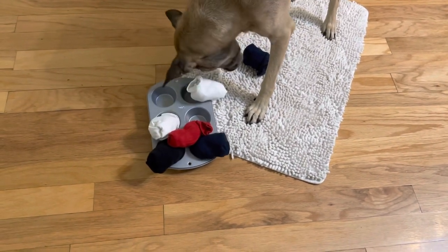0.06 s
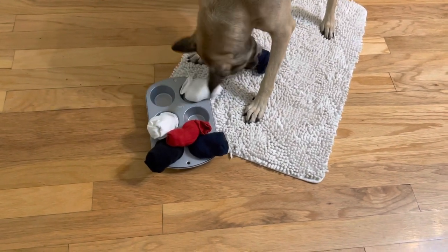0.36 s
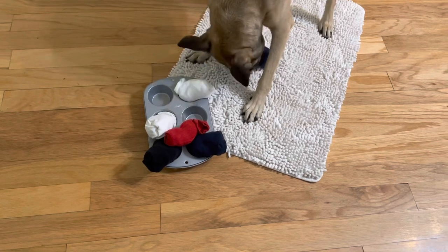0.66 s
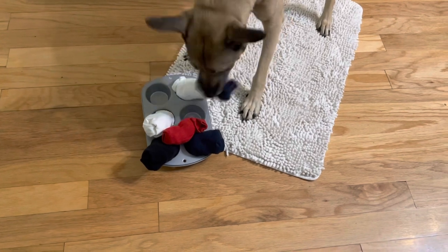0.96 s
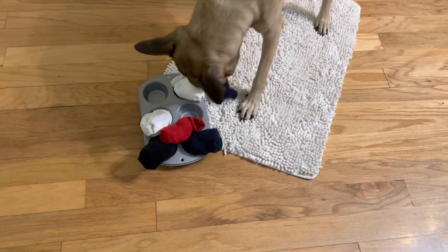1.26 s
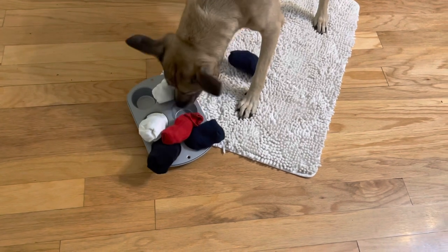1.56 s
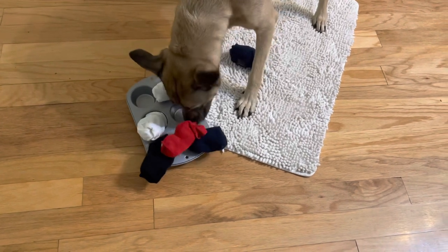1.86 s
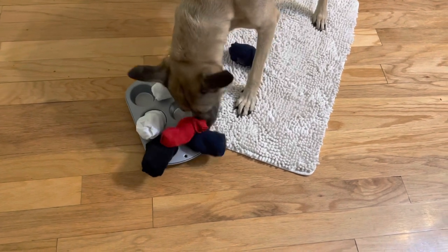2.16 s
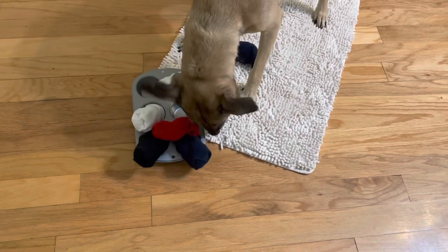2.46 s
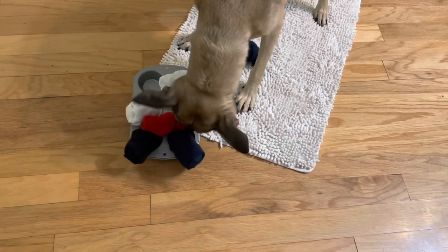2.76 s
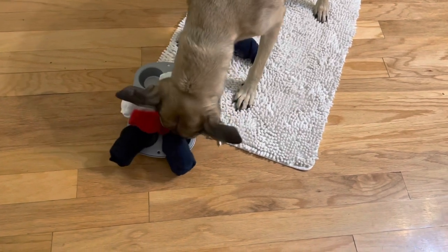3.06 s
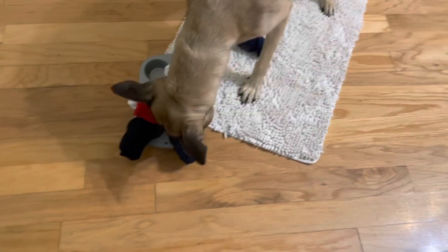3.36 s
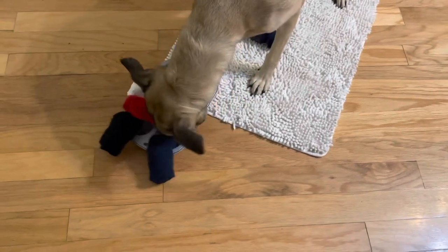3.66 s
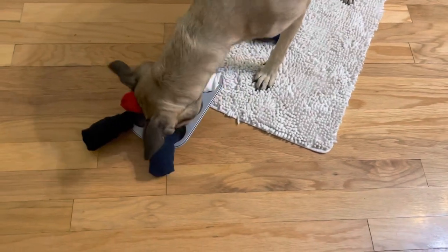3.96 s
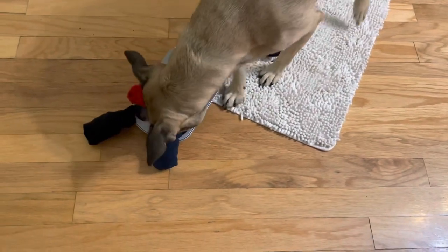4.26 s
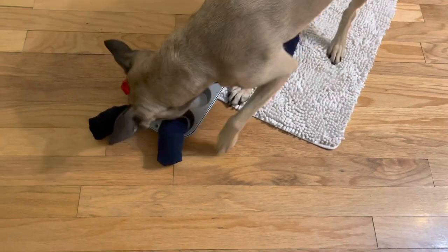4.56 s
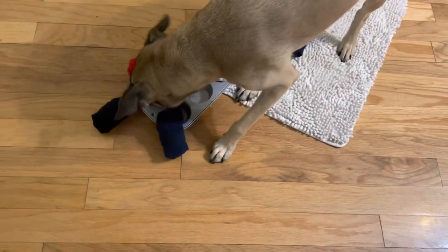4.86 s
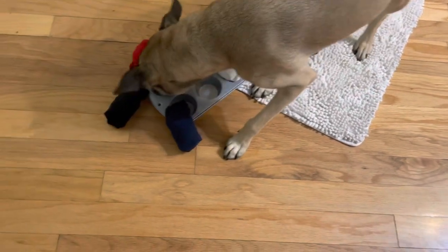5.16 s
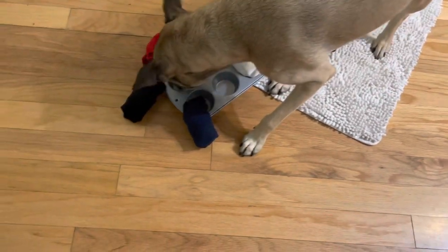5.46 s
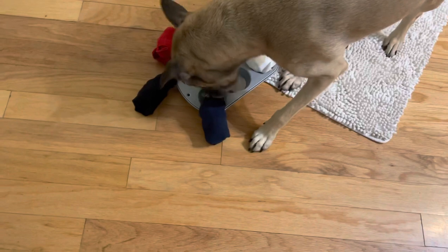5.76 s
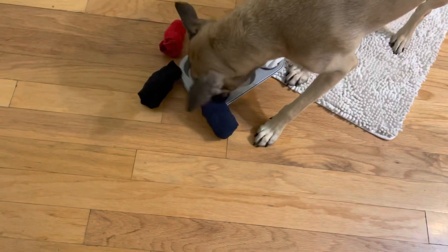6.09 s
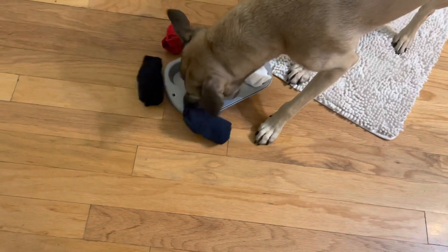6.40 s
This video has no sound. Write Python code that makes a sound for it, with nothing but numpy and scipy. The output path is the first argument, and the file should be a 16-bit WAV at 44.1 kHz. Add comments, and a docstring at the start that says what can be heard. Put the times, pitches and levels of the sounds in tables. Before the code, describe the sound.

Irregular clanks and light ringing clinks of a steel baking tin nudged across floorboards by a dog, with small claw clicks.

```python
"""A steel muffin tin knocks and clinks on a wooden floor as a dog noses cloth bundles out of it.
Each drop rings the pan's low modes until muzzle and cloth damp them; light touches ring the thin steel
brightly. The tin slides on grit, and once grates and sings as it is dragged. Claws and teeth tick,
cloth rustles and the dog's weight thumps the boards. All is heard from a metre or two away,
in a live room with a low household rumble."""
import sys
import numpy as np
from scipy import signal
from scipy.fft import rfft, irfft, next_fast_len
from scipy.io import wavfile

SR = 44100
rng = np.random.default_rng(int(sys.argv[2]) if len(sys.argv) > 2 else 0)


def generate_wav(sig):
    """Save sig (samples, or channels by samples) to the path in sys.argv[1] as 16-bit PCM at SR."""
    pcm = np.round(np.clip(np.atleast_2d(sig).T, -1, 1) * 32767).astype(np.int16)
    wavfile.write(sys.argv[1], SR, pcm)


N = 283563
TIME = np.arange(N) / SR
AGE = TIME[:SR]  # seconds since a hit


def undb(db):
    """Decibels to gain."""
    return 10 ** (np.asarray(db) / 20)


def unit(x):
    """Scale to rms 1."""
    return x / np.sqrt(np.mean(x ** 2))


def unit_peak(x):
    """Scale to peak 1."""
    return x / np.abs(x).max()


def noise(size):
    """White noise."""
    return rng.standard_normal(size)


def waver(size, rate_hz):
    """Smooth random wandering, spread near 1."""
    place = np.arange(size) * rate_hz / SR
    knots = noise(int(place[-1]) + 2)
    return np.interp(place, np.arange(len(knots)), knots)


def curve(points, hz):
    """Join (freq_hz, value) points on a log-frequency axis."""
    freq_hz, value = np.transpose(points)
    return np.interp(np.log(np.maximum(hz, 1)), np.log(freq_hz), value)


def eq(x, points):
    """Minimum-phase equaliser through (freq_hz, gain_db) points."""
    size = next_fast_len(len(x) + 4096, True)
    cepstrum = irfft(np.log(undb(curve(points, np.fft.rfftfreq(size, 1 / SR)))), size)
    cepstrum[1:size // 2] *= 2
    cepstrum[size // 2 + 1:] = 0
    return irfft(rfft(x, size) * np.exp(rfft(cepstrum)), size)[:len(x)]


def resonate(x, hz, width_hz, skirt):
    """Two band-passes in series, the second one skirt times as wide."""
    for band_hz in (width_hz, skirt * width_hz):
        x = signal.lfilter(*signal.iirpeak(hz, hz / band_hz, fs=SR), x)
    return x


def add(track, start_s, x):
    """Mix x into the track at start_s."""
    start = max(int(start_s * SR), 0)
    track[start:start + len(x)] += x[:max(len(track) - start, 0)]


def fade(t60):
    """Exponential decay, 60 dB in t60 seconds."""
    return np.exp(-np.log(1000) * AGE / t60)


def swell(start, end, attack_s, t60):
    """Envelope of a push: it builds, holds until the end and dies away."""
    attack = np.clip((TIME - start) / attack_s, 0, 1) ** 2
    return attack * np.exp(-np.log(1000) * np.maximum(TIME - end, 0) / t60)


def stroke(x, edge):
    """Ease a rub in and out; edge is the share of it spent fading."""
    return unit(x) * signal.windows.tukey(len(x), edge)


def slips(size, rate_hz, spread_db):
    """Stick-slip: random tiny jerks of very unequal strength."""
    return unit((rng.random(size) < rate_hz / SR) * noise(size) * undb(spread_db * rng.random(size)))


def contact(spectrum, chatter, chatter_t60):
    """One push followed by a brief chatter of the touching surfaces; peak 1."""
    push = chatter * noise(SR // 8) * fade(chatter_t60)[:SR // 8]
    push[0] += 1
    return unit_peak(eq(push, spectrum))


def ring(modes, detune, flutter, flutter_hz):
    """Each blow weights and detunes the modes anew; the loose pan rattles, so every mode flutters."""
    out = np.zeros(SR // 3)
    for (hz, db, t60), chance in zip(modes, noise((len(modes), 131))):
        scatter_db, bend, polarity = chance[:3]
        knots = chance[3::2] + 1j * chance[4::2]  # complex: both level and phase flutter
        age = AGE[:min(int(t60 * SR), len(out))]
        step = np.exp((2j * np.pi * hz * (1 + detune * bend) - np.log(1000) / t60) / SR)
        partial = undb(db + scatter_db) * np.sign(polarity) * np.cumprod(np.full(len(age), step))
        wobble = 1 + flutter * np.interp(age * flutter_hz, np.arange(len(knots)), knots)
        out[:len(age)] += np.imag(wobble * partial)
    return unit(out)


# body of the knock, the whole pan damped by floor and cloth: pitch_hz, level_db, t60_s
PAN_MODES = [(241.6, -4, 0.17), (342.6, -5, 0.2), (440, -11, 0.16), (502.6, -0.5, 0.14), (573, -1.5, 0.31),
             (670, -8, 0.067), (783, -4, 0.21), (935, -7.5, 0.19), (1034, -3, 0.094), (1130, -1, 0.18),
             (1186, -3.5, 0.22), (1271, -1, 0.14), (1525, -4.5, 0.33), (1662, -4.5, 0.19), (2190, -8, 0.33),
             (2260, -10.5, 0.56)]
# attack of the knock, pan on wood: freq_hz, gain_db
SLAP_EQ = [(60, -17.5), (230, -7), (450, -1), (1100, 2.5), (1500, -5), (2400, -12.5), (4000, -27),
           (14000, -78.5)]
# the tin drops: start_s, level_db, pitch_hz, treble_db, damping_t60_s, steel_db (its send to clinks)
TIN_DROPS = [(1.525, -18.5, 820, -0.5, 0.41, -19.5), (2.582, -33.5, 850, -12, 0.75, -15.5),
             (2.735, -31.5, 920, -8, 0.078, -30), (3.312, -38, 1090, -12, .1, -27),
             (3.397, -33, 1000, -8, 0.1, -22), (3.507, -30.5, 1000, -17, 0.08, -26.5),
             (3.6124, -18.5, 910, -2.5, 0.65, -19), (4.187, -24, 940, -10.5, 1.4, -38),
             (4.2421, -11.5, 1200, 4, 1.3, -14.5), (4.2517, -22, 1163, 2, 1.3, -5.5),
             (4.291, -41, 950, -4, 1, -7), (5.126, -24, 516, 0.5, 0.49, -14),
             (5.95, -38.5, 592, -22.5, 0.21, -43)]


def knocks(slap_db=1, ring_db=-25.5, note_db=3):
    """The pan slaps the boards and its low modes ring until damped; the landing spot favours one note."""
    out = np.zeros(N)
    for start, db, hz, treble_db, damping_t60, _ in TIN_DROPS:
        modes = ring(PAN_MODES, detune=0.0048, flutter=0.94, flutter_hz=70)
        blow = undb(ring_db) * modes * fade(damping_t60)[:len(modes)]
        add(blow, 0, undb(slap_db) * contact(SLAP_EQ, chatter=0.23, chatter_t60=0.04))
        blow = eq(blow, [(0.59 * hz, -note_db / 2), (hz, note_db / 2), (1.34 * hz, -note_db / 2)])
        bass_db = 1 + 0.058 * (db + 27.5)  # a harder knock flexes more of the pan and sounds deeper
        tone = [(480, bass_db), (850, 0), (1400, 0), (2400, treble_db)]
        add(out, start, undb(db) * eq(blow, tone))
    return out


# bright, clustered ring of the thin steel: pitch_hz, rim_touch_db, cup_touch_db, t60_s
STEEL_MODES = [(1216, -10, -4.5, 0.14), (1509, -3, -20, 0.93), (1525, -9.5, -4, 1),
               (1790, -14.5, -14.5, 0.72), (2605, -22, -2, 0.35), (2786, -14.5, 1.5, 0.82),
               (3020, 0.5, -4, 0.7), (3013, 2, -10, 0.89), (3085, 1, -8.5, 0.17), (3290, -18, -1, 0.14),
               (5004, -4.5, -6, 0.7), (5670, -17.5, -8.5, 0.33), (5843, -4.5, -6, 0.47),
               (6500, -28.5, -8.5, 0.2), (7290, -12, -10, 0.22), (8610, -7, -11, 0.16),
               (8710, -16, -13, 0.18), (10210, -22.5, -13.5, 0.4), (11930, -29.5, -17, 0.35)]
# pitch bend of the rim's main cluster: time_s, rise_hz
RIM_BEND = [(1.8, 48.5), (2.6, 44), (3.35, 60), (3.78, 61), (4.24, -5), (4.9, 0.5)]


def steel_modes(time_s, place, rim_hz=3015, span_hz=110):
    """Modes for a touch between rim (0) and cup (1); the dog's weight flexes the rim cluster sharp."""
    hz, rim_db, cup_db, t60 = np.transpose(STEEL_MODES)
    in_cluster = np.exp(-((hz - rim_hz) / span_hz) ** 2)
    rise_hz = np.interp(time_s, *np.transpose(RIM_BEND)) * in_cluster
    return np.transpose([hz + rise_hz, (1 - place) * rim_db + place * cup_db, t60])


def twins(modes, count=2, spread=0.007, twin_db=-3.5):
    """The cups are alike but not equal, so every mode has weaker near twins."""
    return list(modes) + [(hz * (1 + spread * bend), db + twin_db, t60)
                          for bends in noise((count, len(modes)))
                          for (hz, db, t60), bend in zip(modes, bends)]


def rebounds(x, count=3, rock_s=0.038, scatter_s=0.0014, loss_db=15, dull_db=1.5):
    """Repeat a touch as the pan rocks, weaker and duller each time."""
    out = np.zeros(SR)
    for k, jitter in enumerate(noise(count)):
        add(out, k * rock_s + min(k, 1) * scatter_s * jitter, undb(-k * loss_db) * x)
        x = eq(x, [(4000, 0), (9000, -dull_db)])
    return out


# attack of a clink: freq_hz, gain_db
CLACK_EQ = [(200, -8.5), (700, -9), (1400, 4), (2200, -5.5), (3000, -5.5), (4000, -4), (5800, -3),
            (7000, -22), (8700, -35.5), (13000, -38)]
# light, hard touches on the steel: start_s, level_db, bass_db, treble_db, place (0 rim, 1 cup)
STEEL_TOUCHES = [(0.456, -47.5, 5, 5, 1), (1.327, -57, 0, -11, 0.99), (1.4583, -46.5, -7, -4.5, 0.93),
                 (1.812, -37.5, -7.5, -24, 0.1), (1.853, -42.5, -9, -9.5, 0.28), (1.888, -42, -1, -13, 0.1),
                 (1.923, -47.5, -10, -18, 0.31), (2.191, -59.5, -1, -19, 0.021), (2.41, -57, 5, -13, 0.26),
                 (2.666, -53.5, -1, -14, 0.18), (3.763, -45.5, 0, 0, 0.054), (4.156, -45, 16, -12, 1),
                 (4.3545, -42.5, -5, 2, 0.5), (4.398, -33.5, -6, 0, 0), (4.8447, -37, 11, 0.5, 0.35),
                 (4.9058, -27.5, 3, 0, 0.21), (4.944, -34, 2.5, 2.5, 0), (4.969, -35, 7, -11.5, 0.12),
                 (6.067, -54, 13, -2, 0), (6.1047, -46.5, 4, -22, 0.16), (6.187, -45, 3, -3.5, 0.47)]


def clinks(ring_db=-12, held_t60=0.68):
    """Touches wake the steel's high modes at once, knocks more slowly. Returns clacks and ringing."""
    clacks, rings = np.zeros(N), np.zeros(N)

    def strike(start, db, bass_db, treble_db, place, rise_s, clack_db):
        """A clack, and a ring that takes rise_s to spread through the sheet."""
        tone = [(600, bass_db - 8.5), (1500, bass_db), (2800, 0), (3300, 0), (4900, treble_db)]
        clack = eq(contact(CLACK_EQ, chatter=0.47, chatter_t60=0.15), tone)
        add(clacks, start, undb(db + clack_db) * rebounds(clack))
        modes = ring(twins(steel_modes(start, place)), detune=0.0012, flutter=0.75, flutter_hz=85)
        # a gentle touch, or a grip that dulls the treble, shortens the ring
        t60 = held_t60 * undb(0.38 * (db + 34) + 0.4 * min(treble_db, 0))
        envelope = np.minimum(AGE / rise_s, 1) * fade(t60)
        add(rings, start, undb(db + ring_db) * rebounds(eq(modes * envelope[:len(modes)], tone)))

    for touch in STEEL_TOUCHES:
        strike(*touch, rise_s=0.00028, clack_db=-6)
    for start, db, *_, steel_db in TIN_DROPS:
        strike(start, db + steel_db, bass_db=-1, treble_db=-5, place=0.12, rise_s=0.015, clack_db=-14)
    return clacks, rings


# resonances of the dragged pan: pitch_hz, width_hz, level_db
GRATE_BANDS = [(695, 260, -1.5), (843, 150, 4), (937, 37, 2), (1010, 66, -3.5), (1953, 54, -2.5),
               (2036, 39, -9)]
# the one drag: start_s, end_s, level_db
DRAG_STROKE = (1.6595, 1.774, -35)


def grating():
    """The dragged pan judders across the boards and the jerks drive its resonances."""
    start, end, db = DRAG_STROKE
    jerks = slips(N, rate_hz=750, spread_db=15)
    rasp = sum(undb(band_db) * resonate(jerks, hz, width, skirt=3) for hz, width, band_db in GRATE_BANDS)
    return undb(db) * unit(rasp) * swell(start, end, attack_s=0.052, t60=0.57)


# the drag sings in fading spurts: start_s, end_s, level_db
SING_SPURTS = [(1.734, 1.782, -33.5), (1.821, 1.932, -38), (2.009, 2.068, -47.5), (2.13, 2.252, -64.5)]


def singing(pitch_hz=924, wander_hz=7):
    """Friction locks on to one mode of the pan, which sings with an unsteady pitch."""
    hz = pitch_hz + wander_hz * waver(N, rate_hz=75)
    tone = unit(np.sin(2 * np.pi * np.cumsum(hz) / SR))
    spurts = [undb(db) * swell(start, end, attack_s=0.013, t60=0.18) for start, end, db in SING_SPURTS]
    return tone * np.max(spurts, axis=0)


# colour of grit under the pan: freq_hz, gain_db
GRIT_EQ = [(100, -10.5), (400, -3.5), (1100, -2.5), (1800, -6), (2800, -6), (4000, -16.5), (6000, -20.5),
           (7800, -33.5), (10000, -18), (14000, -41.5)]
# the tin slides on the boards: start_s, end_s, level_db, bass_db, treble_db
TIN_SLIDES = [(1.312, 1.44, -61.5, 3.5, -2.5), (1.424, 1.535, -48, -9.5, -6), (2.293, 2.471, -56, -6, -18),
              (2.479, 2.715, -64, 4.5, -17), (3.266, 3.53, -59.5, 5, -18.5),
              (3.513, 3.648, -49.5, 8.5, -10.5), (4.148, 4.204, -37, -15.5, 1), (6.067, 6.32, -58.5, 5, -4),
              (6.282, 6.486, -53, 9.5, -7)]


def slides(trim_db=-3, uneven_db=5.5):
    """Grit under the sliding pan crackles unevenly, and its coarser jolts keep the steel rattling."""
    out = np.zeros(N)
    for start, end, db, bass_db, treble_db in TIN_SLIDES:
        size = int((end - start) * SR)
        grit = slips(size, rate_hz=1400, spread_db=5.5) * undb(uneven_db * waver(size, rate_hz=51))
        jolts = slips(size, rate_hz=300, spread_db=10)
        rattle = sum(undb(mode_db) * resonate(jolts, hz, width_hz=65, skirt=8)
                     for hz, mode_db, _ in steel_modes(start, place=0.89))
        rub = stroke(unit(eq(grit, GRIT_EQ)) + unit(rattle), edge=0.14)
        add(out, start, undb(db + trim_db) * eq(rub, [(500, bass_db), (1200, 0), (4000, treble_db)]))
    return out


# the muzzle bumps a cloth-filled cup: start_s, level_db
MUZZLE_BUMPS = [(5.419, -36), (5.503, -44), (5.911, -46)]


def bumps(cup_hz=590):
    """A soft push sounds only the hollow note of one cup."""
    out = np.zeros(N)
    for start, db in MUZZLE_BUMPS:
        note = resonate(noise(SR) * fade(t60=0.07), cup_hz, width_hz=150, skirt=4)
        add(out, start, undb(db) * unit_peak(note))
    return out


# colour of a dry claw or tooth click: freq_hz, gain_db
CLICK_EQ = [(100, -8.5), (500, -3.5), (1200, -4), (2200, -6), (4000, -9.5), (6000, -14), (8000, -23),
            (11000, -25), (14000, -40)]
# claws and teeth land in pairs: start_s, level_db, treble_db, second_click_db (against the first)
CLICK_PAIRS = [(1.6136, -38, 3.5, -23.5), (3.59, -51.5, 11, 11), (4.146, -41.5, 13.5, 12),
               (4.6172, -45, 9, 14), (5.31, -46.5, -2.5, -32), (5.417, -46, 4, -13), (5.506, -48, -10, -29)]


def ticks(trim_db=3, gap_s=0.014, duller_db=5):
    """Claws on wood and teeth on steel: two dry clicks, the second with less bass and treble."""
    out = np.zeros(N)
    for start, db, treble_db, second_db in CLICK_PAIRS:
        for k in range(2):
            click = contact(CLICK_EQ, chatter=0.89, chatter_t60=0.035)
            tone = [(600, -2 - k * duller_db), (2400, 0), (5500, treble_db - k * duller_db)]
            add(out, start + k * gap_s, undb(db + trim_db + k * second_db) * eq(click, tone))
    return out


# tiny snaps: start_s, level_db, pitch_hz
THREAD_SNAPS = [(0.146, -64, 2430), (0.157, -56.5, 4540), (0.1697, -54, 5300), (0.2537, -68, 4130),
                (1.056, -54.5, 960), (5.649, -61, 4100), (5.805, -54.5, 3340), (5.845, -54, 3390)]


def snaps(trim_db=3):
    """Teeth and threads snap: very short clicks, each with one broad resonance."""
    out = np.zeros(N)
    for start, db, hz in THREAD_SNAPS:
        tone = [(0.055 * hz, -6), (0.69 * hz, 0), (hz, 12), (1.4 * hz, 6), (3 * hz, -16)]
        click = eq(contact(CLICK_EQ, chatter=1, chatter_t60=0.0093), tone)
        add(out, start, undb(db + trim_db) * unit_peak(click))
    return out


# boom of the floor: pitch_hz, width_hz, level_db
FLOOR_MODES = [(48, 14, -5), (82.6, 62, -6), (168, 410, -12.5)]
# the dog's weight lands: start_s, level_db
FLOOR_THUMPS = [(4.179, -33), (4.249, -32), (4.3, -35.5)]


def thumps():
    """A soft, heavy push from the dog booms in the floorboards."""
    out = np.zeros(N)
    for start, db in FLOOR_THUMPS:
        push = noise(SR) * fade(t60=0.24)
        boom = sum(undb(mode_db) * resonate(push, hz, width, skirt=3)
                   for hz, width, mode_db in FLOOR_MODES)
        add(out, start, undb(db) * unit_peak(boom))
    return out


# cloth drags over the cups: start_s, end_s, level_db, centre_hz, width_ratio (of the centre)
CLOTH_STROKES = [(0, 0.054, -66.5, 500, 0.57), (0, 0.031, -71.5, 2420, 1.06),
                 (0.141, 0.215, -73, 1310, 0.35), (0.162, 0.204, -71, 4860, .3),
                 (0.245, 0.283, -68.5, 4250, 0.6), (0.703, 0.781, -73.5, 695, 1.1),
                 (0.988, 1.062, -77.5, 2150, 0.56), (2.841, 2.87, -76, 2750, 0.015),
                 (2.949, 3, -73, 2420, 0.53), (3.41, 3.54, -76, 4100, 0.63),
                 (5.238, 5.339, -70.5, 4490, 0.81), (5.727, 6.033, -78, 3180, 0.84)]


def rustles(trim_db=1):
    """Fibres catch and let go in one band; a narrow band squeaks."""
    out = np.zeros(N)
    for start, end, db, hz, width_ratio in CLOTH_STROKES:
        fibres = slips(int((end - start) * SR), rate_hz=2500, spread_db=17)
        band = resonate(fibres, hz, width_ratio * hz, skirt=1)
        add(out, start, undb(db + trim_db) * stroke(band, edge=0.24))
    return out


# stereo image of the direct sound: freq_hz, left_lead_rad, left_over_right_db
STEREO_IMAGE = [(412, -1.2, 3), (850, 1.54, 6.5), (1240, 1.35, 6.5), (1880, 1.5, -1.5), (2950, 0.82, 0),
                (4640, 2.06, 3), (6100, -1.8, 2), (8170, -3, 0), (10200, -7.5, 0.5), (11900, -5.5, -0.5),
                (12800, -9, -1)]


def direct_path(x):
    """Direct sound reaches the two microphones out of step and mostly louder on the left."""
    size = next_fast_len(N + SR, True)
    hz = np.fft.rfftfreq(size, 1 / SR)
    lead_rad, left_db = (curve(np.array(STEREO_IMAGE)[:, [0, k]], hz) for k in (1, 2))
    left = np.exp(0.5j * lead_rad) * undb(left_db / 2)
    return irfft(rfft(x, size) * np.array([left, 1 / left]), size)[:, :N]


def stereo_noise(size, spectrum, side_eq):
    """Coloured left and right noise; side_eq sets the width at each frequency."""
    mid = eq(noise(size), spectrum)
    side = eq(eq(noise(size), spectrum), side_eq)
    return np.array([mid + side, mid - side])


# reverb decay: freq_hz, t60_s
ROOM_DECAY = [(150, 0.5), (500, 0.48), (1200, 0.55), (3000, 0.52), (12000, 0.51)]


def room(x, gap_s=0.0012, build_s=0.0041, early_db=4, early_t60=0.046):
    """A diffuse tail after a short gap, strongest at first from the near walls, narrow in the bass."""
    side_eq = [(150, -9.5), (300, -9), (600, -3.5), (1000, -2)]
    field = stereo_noise(SR, [(30, 16), (200, 7), (15000, -5)], side_eq)
    hz = np.fft.rfftfreq(SR, 1 / SR)
    tail = 0
    for band_hz, t60 in ROOM_DECAY:
        band = curve([(f, float(f == band_hz)) for f, _ in ROOM_DECAY], hz)
        tail = tail + irfft(rfft(field) * band, SR) * fade(t60)
    tail *= np.clip((AGE - gap_s) / build_s, 0, 1)
    tail *= 1 + undb(early_db) * fade(early_t60)
    return signal.fftconvolve(x[None], unit(tail) / np.sqrt(SR), axes=1)[:, :N]


# room tone: freq_hz, gain_db
RUMBLE_EQ = [(18, -29.5), (30, -6), (60, -0.5), (220, -7), (415, -19), (900, -31), (2080, -44), (3780, -45),
             (7500, -56.5), (10500, -55), (15000, -62.5)]
# steady tones of a household motor: pitch_hz, level_db
MOTOR_HUM = [(55, -63.5), (119.5, -67.5)]


def room_tone(rumble_db=-57.5, left_over_right_db=1):
    """Steady low rumble and motor hum of the house, with a faint hiss."""
    side_eq = [(50, -13.5), (150, -11.5), (400, -4.5), (1000, -2.5), (8000, 0)]
    rumble = undb(rumble_db) * unit(stereo_noise(N, RUMBLE_EQ, side_eq))
    hum = sum(undb(db) * unit(np.sin(2 * np.pi * (hz * TIME + rng.random()))) for hz, db in MOTOR_HUM)
    return (rumble + hum) * undb(left_over_right_db * np.array([[0.5], [-0.5]]))


def scene():
    """Tin, dog and cloth arrive directly and, all but the floor thumps, through the room."""
    grate, sing = grating(), singing()
    clack, steel = clinks()
    knock = knocks() + bumps()
    tick = ticks() + snaps() + clack
    rubbing = slides() + rustles() + undb(-2.5) * grate
    direct = knock + tick + steel + rubbing + sing + thumps()
    reverb_send = undb(-3) * (knock + rubbing) + undb(1.5) * tick + undb(-8.5) * steel + undb(-13) * sing
    return direct_path(direct) + room(reverb_send) + room_tone()


def record(dry):
    """The microphones cut the deepest bass and the top."""
    low_cut = signal.butter(4, 36, "highpass", fs=SR, output="sos")
    high_cut = signal.ellip(8, 0.2, 70, 13500, fs=SR, output="sos")
    return signal.sosfilt(high_cut, signal.sosfilt(low_cut, dry))


dry = scene()
out = record(dry)
generate_wav(out)
```